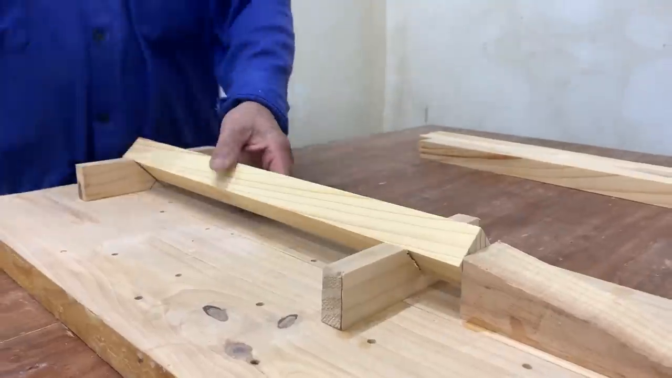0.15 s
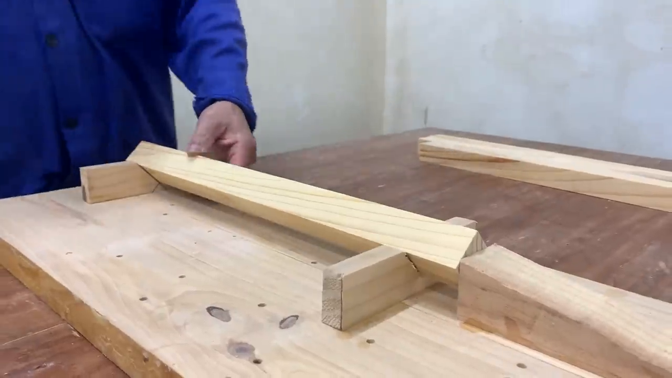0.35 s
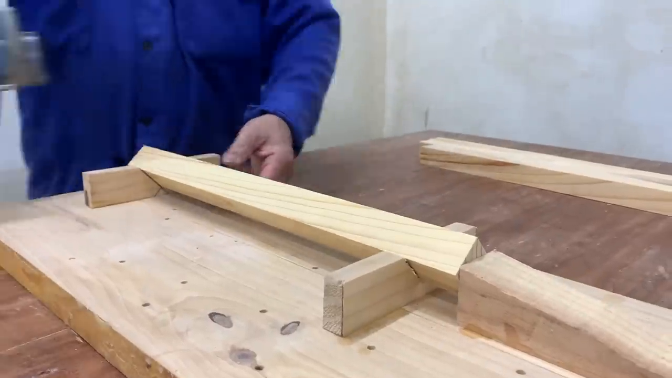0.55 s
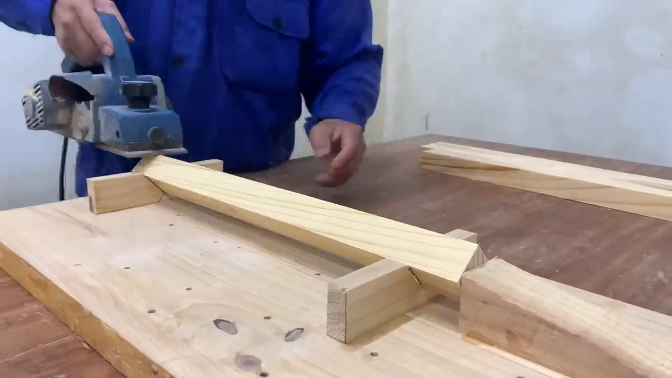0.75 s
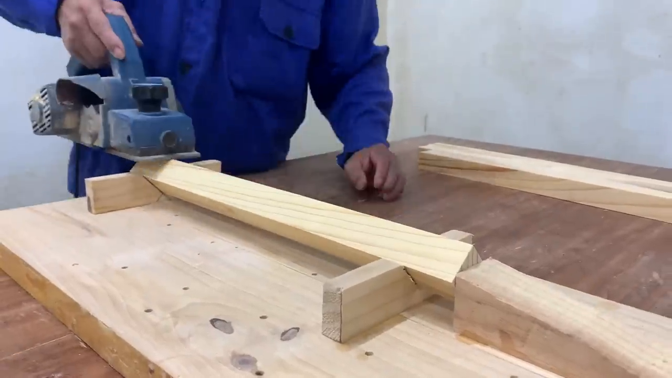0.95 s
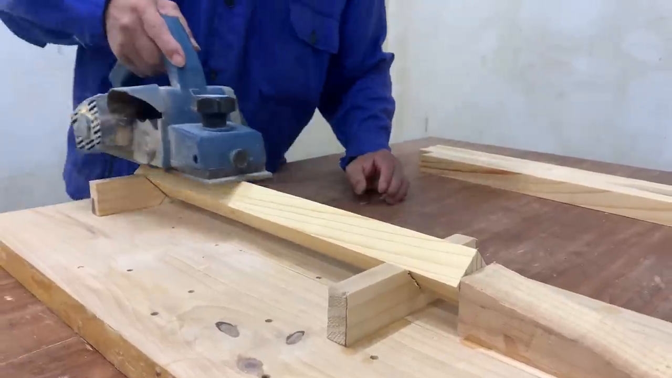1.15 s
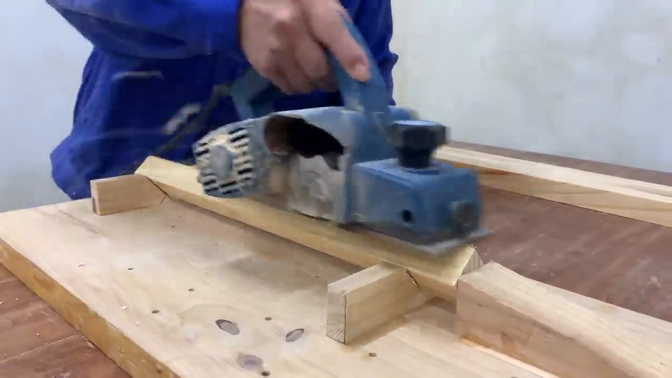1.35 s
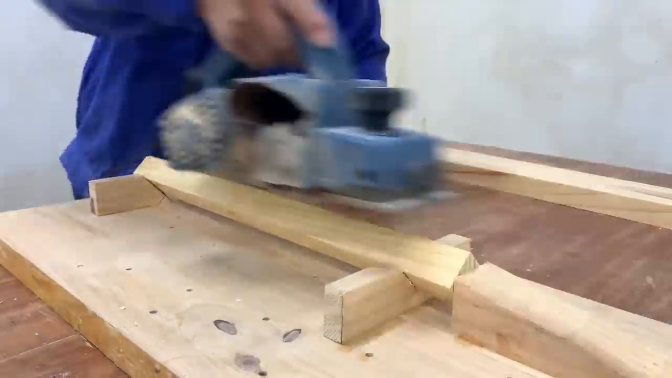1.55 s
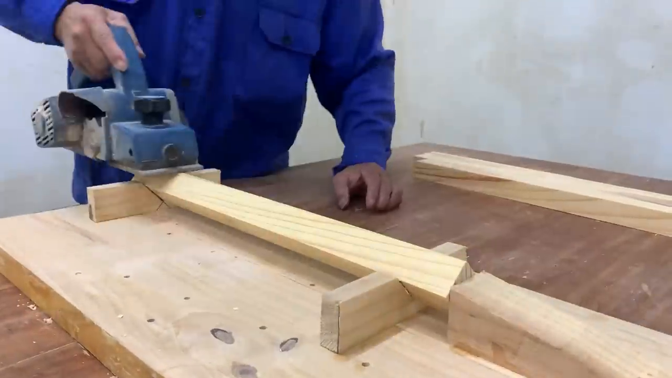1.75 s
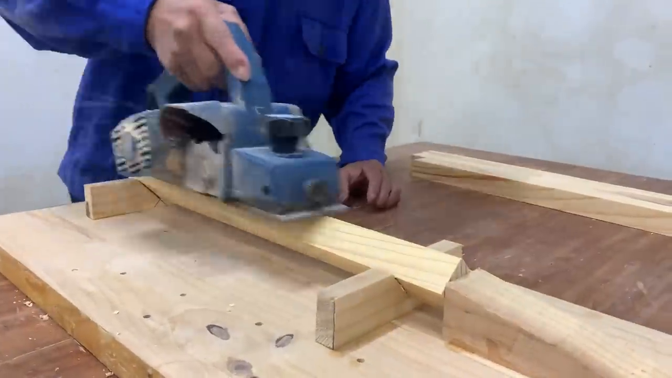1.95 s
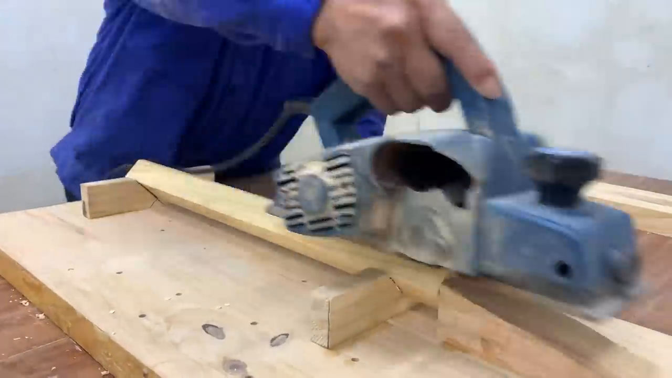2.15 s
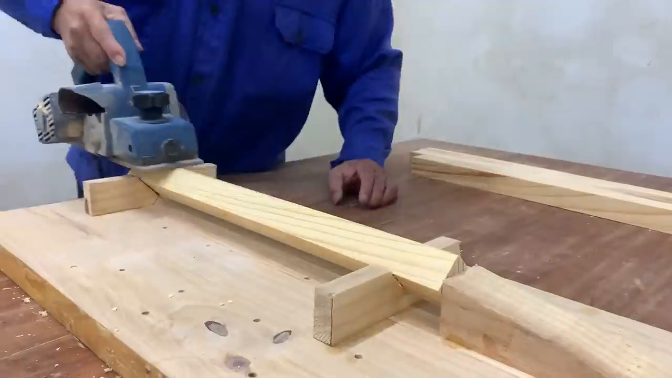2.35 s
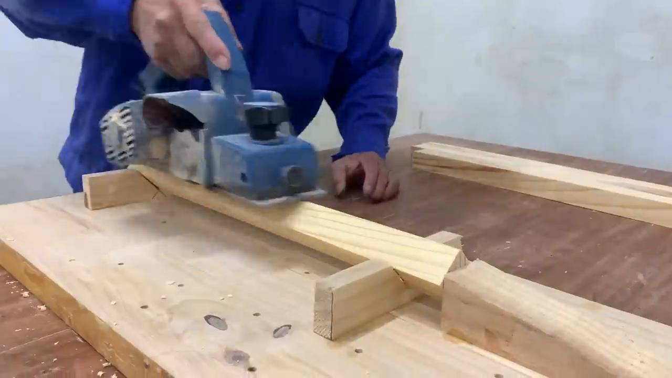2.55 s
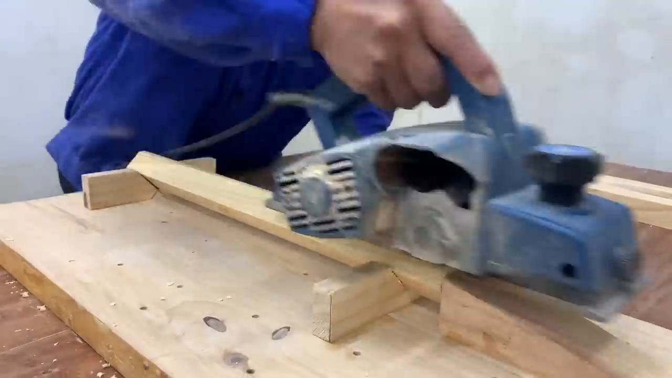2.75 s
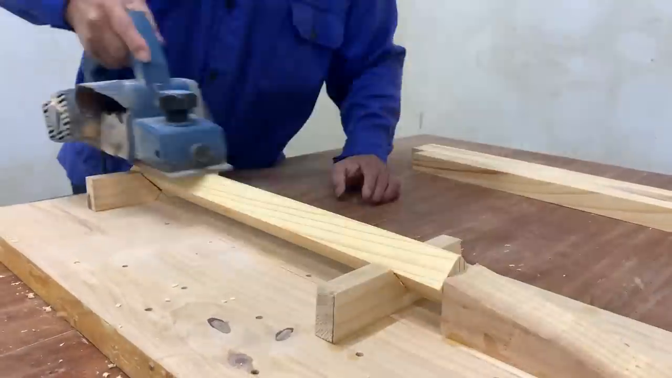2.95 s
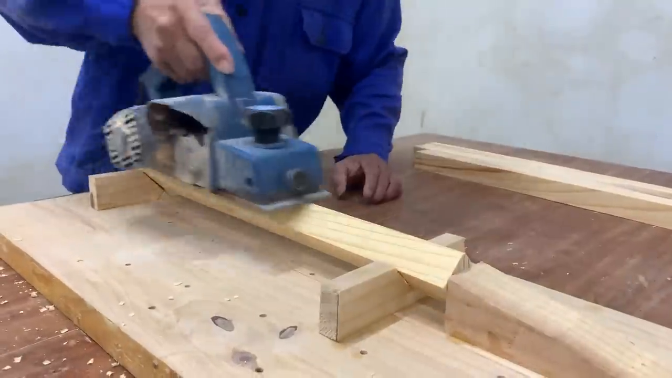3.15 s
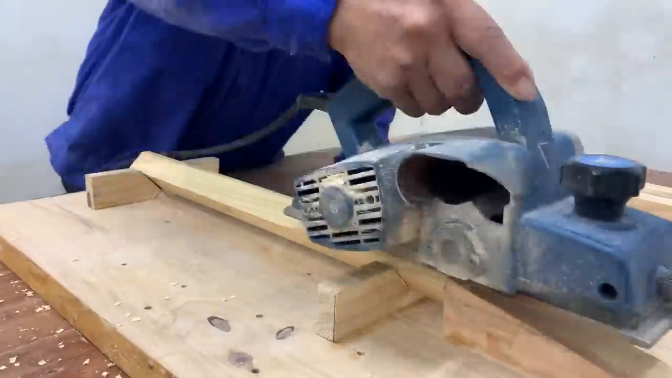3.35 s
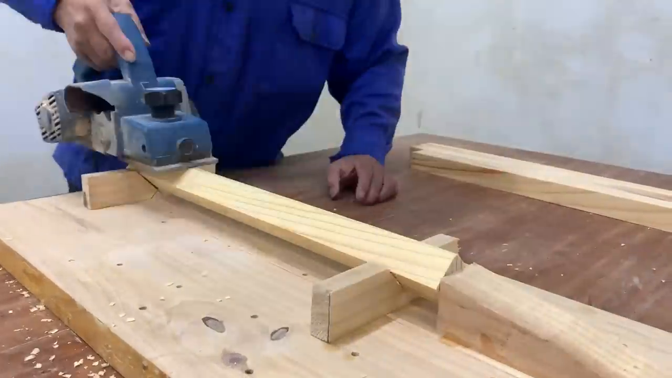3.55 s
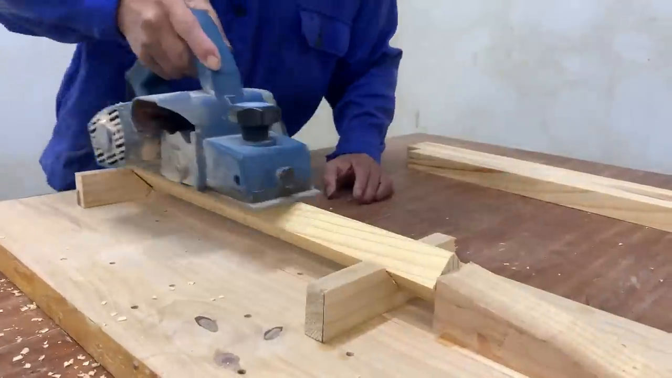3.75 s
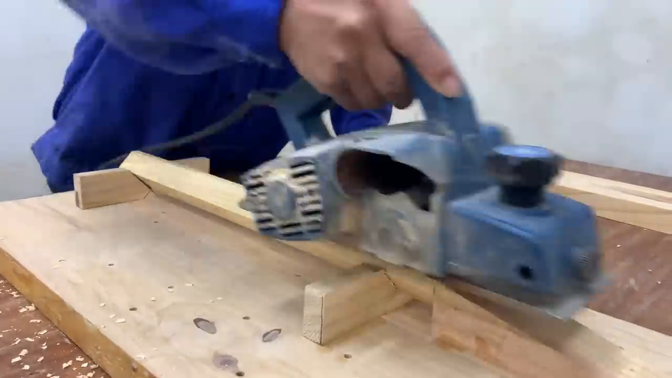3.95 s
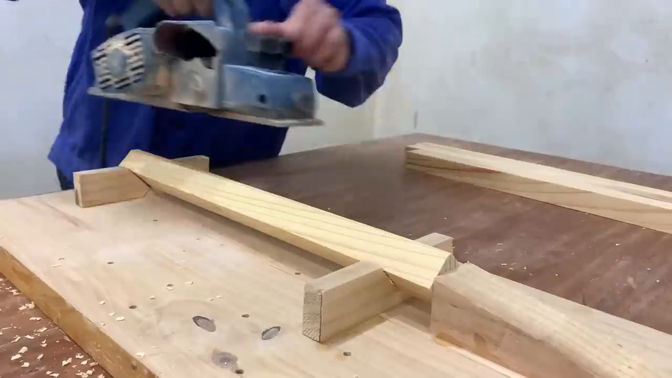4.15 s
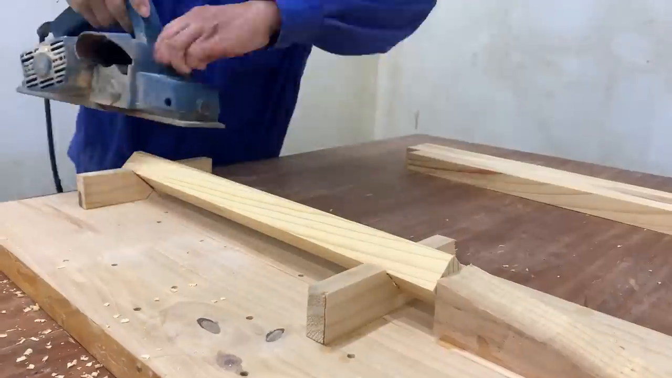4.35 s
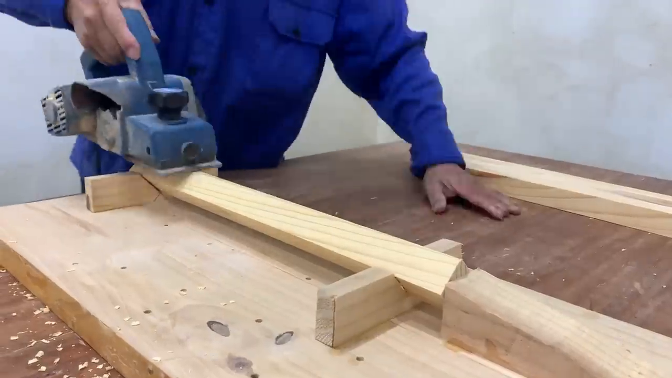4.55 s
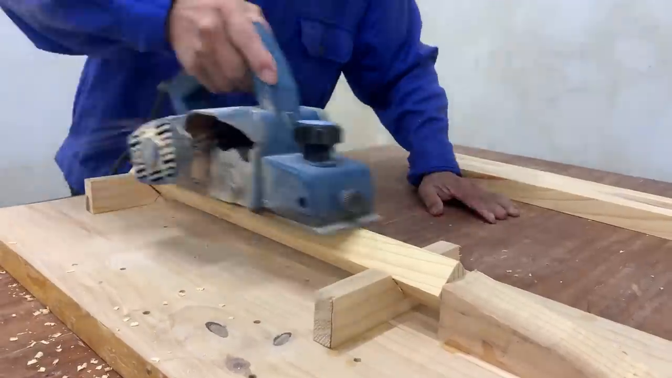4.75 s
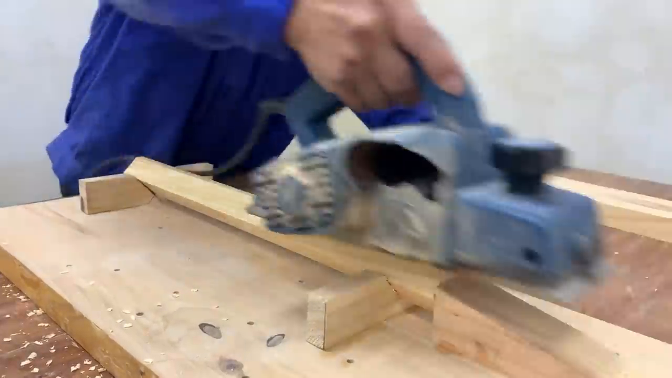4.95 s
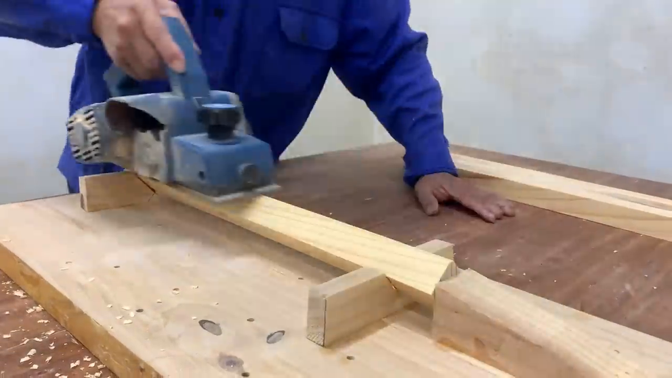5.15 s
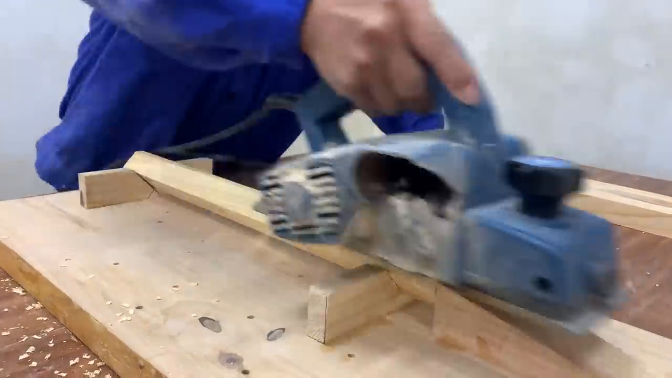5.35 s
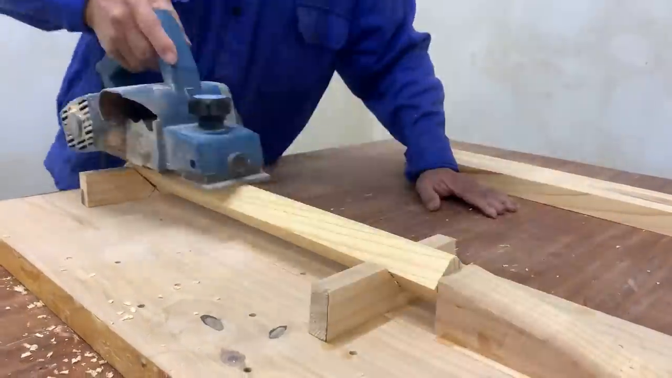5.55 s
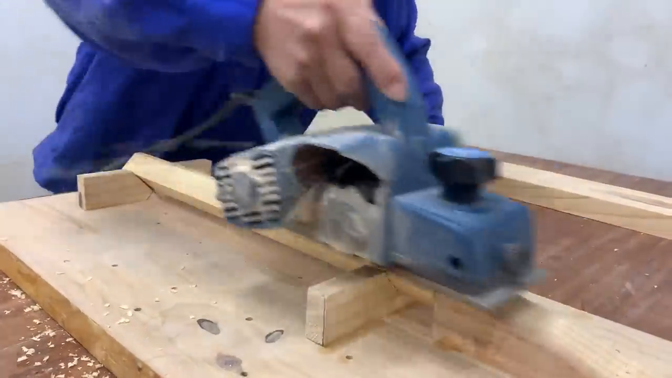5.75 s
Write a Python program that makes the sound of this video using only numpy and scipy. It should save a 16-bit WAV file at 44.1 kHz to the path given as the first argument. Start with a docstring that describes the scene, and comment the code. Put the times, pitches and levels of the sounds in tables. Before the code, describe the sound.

A close stereo scene in a bare workshop. From 0 to 0.3 s a pine batten judders, scrapes and knocks into its cradle, with the sharpest dry crack near 0.25 s, while a planer freewheels quietly, its low whirr falling in pitch under a thin high whistle. A soft bump comes near 0.8 s. Just before 1 s the motor buzzes and groans, the belt gives tiny high squeaks, and a loud whine sweeps up fast over broad rushing air. Passes swell closest around 1.6, 2.3, 2.9, 3.5, 4.1, 5.0, 5.5 and 5.8 s, the pitch sagging slightly as the knives bite and the shrill tones flaring as the tool nears. The trigger is released briefly at 1.6 s and for longer from 4.1 to 4.6 s; the whine slides down, then climbs again. Faint dull bench thuds punctuate the passes. The motor is still running at the end.

```python
"""Electric hand planer at work

A hand planer coasts down close by in a bare workshop while a pine batten chatters into its cradle.
It is switched on and pushed along the batten pass after pass; the trigger is let go twice.
Fan, armature and belt whine as tones locked to the shaft, over filtered noise for air and chips.
The wood is struck and scraped modes: judders and knocks of the batten, soft bumps on the bench."""
import sys
import numpy as np
from scipy import signal
from scipy.fft import rfft, irfft
from scipy.io import wavfile
from scipy.ndimage import uniform_filter1d

SR = 44100
rng = np.random.default_rng(int(sys.argv[2]) if len(sys.argv) > 2 else 0)


def generate_wav(signal):
    """Clip the signal to [-1, 1] and save it as 16-bit WAV at the path in sys.argv[1]."""
    frames = np.transpose(np.atleast_2d(signal))
    scaled = np.clip(frames, -1, 1) * 32767
    pcm = np.round(scaled).astype(np.int16)
    wavfile.write(sys.argv[1], SR, pcm)


N = 259749
TIME = np.arange(N) / SR
# the grid on which noise is painted: bins in Hz, frames in s
BINS = np.fft.rfftfreq(512, 1 / SR)
FRAMES = np.arange(N // 128 + 5) * 128 / SR

# the freewheeling tool before switch-on: t/s, shaft speed/turns per s, level/dB
COAST = [(0, 98, -30), (.37, 83, -34), (.74, 68.4, -39), (1.0, 64, -42)]
# its whirr, relative spectrum: f/Hz, level/dB per Hz
WHIRR_SPECTRUM = [(41, -57), (70, -41), (108, -18), (207, -10.5), (243, -12), (311, -7), (348, -11.5),
                  (803, 0.5), (1100, -4), (1260, -1.5), (1350, -3.5), (1620, -9.5), (2910, -4.5),
                  (6280, -12.5), (15500, -31)]
# its faint hum, relative: multiple of the shaft rate, level/dB
COAST_TONES = [(4, -4.5), (6, -12), (8, -9), (10, -18), (12, -10), (16, -11)]

# the batten judders into its cradle: t/s, length/s, level/dB, swell over the burst/dB
JUDDERS = [(0.074, 0.015, -22.5, -5), (.099, 0.013, -29, -4), (0.14, .034, -20.5, -2),
           (0.238, 0.013, -18, 3), (0.246, .038, -18.5, -8.5), (0.299, 0.044, -34.5, -14)]
# its hard knocks: t/s, level/dB
KNOCKS = [(0.154, -20), (0.171, -24), (0.2454, -10), (0.26, -29)]
# ringing modes of batten and bench: f/Hz, level/dB, t60/s
PINE_MODES = [(300, -11, 0.12), (463, 1, 0.06), (590, -2, 0.061), (816, 0, 0.062), (899, 4, 0.12),
              (1046, -2, 0.025), (1380, 1, 0.013), (1820, -12, 0.034), (2160, -2, 0.021),
              (2940, -19, 0.016), (3400, -3, 0.013), (4150, -18, 0.012)]
# spectrum of the dense, short-lived modes of the wood: f/Hz, level/dB per Hz
CLATTER_SPECTRUM = [(150, -26), (330, 0), (600, -1.5), (1200, -2.5), (2400, -7), (3800, -13.5),
                    (5500, -18.5), (9000, -49), (15000, -50)]
# the sole and the hand bump the bench: t/s, level/dB, share of dead push
BUMPS = [(0.817, -35, 0.037), (.853, -40, 0.28), (0.964, -37, .2), (1.173, -40.5, 0.15), (1.234, -63, .8),
         (1.738, -40.5, .04), (2.148, -47, .08), (2.389, -44.5, .08), (2.753, -50, 0.023),
         (3.048, -42, 0.29), (3.598, -42.5, 0.075), (3.694, -42, .4), (3.749, -49, .7), (4.673, -48, .55),
         (4.744, -43.5, .4), (5.148, -39, .2), (5.249, -44.5, .45), (5.551, -48, .1), (5.646, -37.5, .35)]
# modes of the bench top, before each blow's own variation: f/Hz, level/dB, t60/s
BENCH_MODES = [(110, -19, 0.065), (155, -4.5, 0.053), (190.4, 6.5, 0.052), (242, 5.5, 0.027)]

SWITCH_ON = 0.97  # s, the current sets in
# the trigger is held: pressed t/s, let go t/s
TRIGGER = [(1.0, 1.614), (1.758, 4.133), (4.572, 6.0)]
# the motor pulls towards its free speed (turns per s), harder the further it lags
# (per s, and per s and turn per s)
FREE_SPEED, PULL, STALL_PULL = 148.83, 2.893, .06
# share of speed lost per s when released; turns per s that a full bite takes off each s
DRAG_PER_S, CUT_LOAD = .831, 15
# the knives bite into the batten: deepest t/s, half length/s
CUTS = [(1.397, .372), (2.098, .078), (2.673, .171), (3.254, .16), (3.887, .132), (4.933, .052),
        (5.421, .082), (5.823, .057)]
# each pass carries the tool nearer and away again: nearest t/s, approach/s, retreat/s, swell/dB,
# t/s at which the bench reflection cancels the armature tone, change of that tone/dB
PASSES = [(1.58, 0.3, 0.089, 8.5, 1.53, 0), (2.265, 0.24, .087, 9, 2.13, -15),
          (2.875, 0.27, 0.1, 7.5, 2.8, -4), (3.451, 0.13, 0.092, 7.5, 3.27, -12),
          (4.11, 0.18, 0.12, 7.5, 4.3, -84), (5.02, 0.21, 0.14, 9, 4.9, -16),
          (5.5, 0.13, 0.094, 11, 5.37, 0.5), (5.83, 0.081, 0.32, 6.5, 5.71, -19)]
DIP_S = 0.036  # half length of the armature tone's dip
SETTLE_S = 0.27  # time constant with which the switch-on surge dies away

# buzz of the starting current
INRUSH_DB, INRUSH_RISE_S, INRUSH_HOLD_S, INRUSH_FALL_DB_PER_S = -29, 0.0042, 0.063, 200
# the belt squeaks as it takes up the load: t/s, f/Hz, level/dB
SQUEAKS = [(.993, 11900, -33), (1.026, 10300, -39), (1.052, 11800, -24)]
SQUEAK_FALL_DB_PER_S = 1100

# relative spectrum of the air through the housing: f/Hz, level/dB per Hz
AIR_SPECTRUM = [(120, -19.5), (200, -33), (290, -16), (450, -13.5), (750, -12.5), (1100, -9.5), (1600, 4),
                (2050, -1), (3300, 2), (5200, -4.5), (7000, -9.5), (8700, -9.5), (10500, -12.5),
                (15000, -6)]
AIR_DB = -32.5  # before the swells
# how the air follows the tool: f/Hz, share of the pass swell, dB per dB of speed, extra at switch-on/dB
AIR_LAW = [(500, 0.42, 2.5, 21), (1020, 0.76, 2.9, 22), (1480, 0.71, 3, 22), (2230, 0.2, 3.87, 30),
           (4350, 0.32, 1.5, 20.5), (6650, 1.0, 2.46, 26), (12200, 0.41, 2.4, 24.5)]

# fan tones, relative: multiple of the shaft rate, level/dB
FAN_TONES = [(11, -5), (12, 1.5), (18, -73), (22, -4.5)]
# shrill lines, relative: multiple of the shaft rate, level/dB
SHRILL_TONES = [(30, -37), (33, -38), (35, -45), (42, -41), (44, -46), (48, -36), (54, -44), (55, -41),
                (57, -46), (60, -34), (62, -46), (66, -42), (72, -41), (77, -50), (78, -48), (84, -41),
                (88, -48), (90, -42), (96, -39), (99, -45), (102, -48), (108, -49)]
BELT_TEETH = 28.43  # tooth rate as a multiple of the shaft rate
# belt tone and sidebands, relative: multiple of the tooth rate, plus shaft multiples, level/dB
BELT_TONES = [(1, 0, 0), (1, 6, -18), (1, 11, -11.5), (1, 17, -40), (1, 22, -15.5), (1, 33, -22),
              (2, 0, -45), (2, 11, -27)]
# how each tone follows the tool:
# level at full speed/dB, share of the pass swell, dB per dB of speed, extra at switch-on/dB
FAN_LAW = (-29.5, 0.187, 2.5, 25)
DRONE_LAW = (-44.5, 0.42, 2, 24.5)
ARMATURE_LAW = (-26.5, 0.6367, 4.5, 18)
BELT_LAW = (-39, 0.9649, -0.3, 9.5)
OVERTONE_LAW = (-28, 0.75, 2, 22.5)
SHRILL_LAW = (-6.5, 0.8964, 3, 23)
# the belt tone's rise and fall on top of its law: t/s, level/dB
BELT_LEVEL = [(1.0, -3), (1.3, 6.5), (1.55, 1.5), (2.0, -1), (2.3, -3), (2.55, -10), (2.9, 5.5), (3.1, -5),
              (3.4, 5.5), (3.7, 0.5), (4.1, 5.5), (4.4, 4.5), (4.56, -8), (4.66, 7), (4.78, -10), (5.05, 5),
              (5.3, 4.5), (5.55, 7.5), (5.89, -2)]
# the fan peaks where the blade rate meets a resonance of the housing: blade rate f/Hz, level/dB
HOUSING = [(800, -57), (1200, -19), (1350, -17), (1460, -9), (1580, 1), (1660, 0.5), (1760, 0)]
# the motor tones swell as they glide through a resonance of the air outlet: f/Hz, level/dB
OUTLET = [(1500, -12), (2000, 8), (2450, -0.5), (2900, -4), (3250, 0.5), (3600, -1.5), (4000, -10.5),
          (4500, -8.5), (5200, -6.5)]
# the shrill lines flare as they glide through a resonance of the cooling slots: f/Hz, level/dB
SLOTS = [(5000, -4.5), (7000, 0), (8000, -2.5), (8900, 1), (9700, -1.5), (10600, -6.5), (15000, -3.5)]

# decay of the workshop: f/Hz, t60/s
ROOM_DECAY = [(150, 0.48), (1000, 0.34), (4000, 0.23), (12000, 0.13)]
# left-right likeness of the stereo pair: f/Hz, correlation
LIKENESS = [(100, 0), (400, 0.82), (1500, 0.77), (3000, 0.6), (5000, 0.25), (8000, 0.31), (13000, -0.26)]
# balance of the stereo pair: f/Hz, left minus right level/dB
TILT = [(100, 3), (300, -2), (1000, -2.5), (2200, -2.5), (5000, 0.8), (9000, -1)]
EDGE_HZ = 15850  # upper band limit


def amp(db):
    """Decibels to gain."""
    return 10 ** (np.asarray(db) / 20)


def unit(x):
    """Scales to rms 1."""
    return x / np.sqrt(np.mean(x ** 2) + 1e-20)


def curves(rows, t=TIME):
    """The columns of a time table, joined by straight lines."""
    s, *columns = np.transpose(rows)
    return [np.interp(t, s, c) for c in columns]


def across(points, hz):
    """Reads a spectrum on a log-frequency axis."""
    f, value = np.transpose(points)
    return np.interp(np.log(hz + 1), np.log(f), value)


def add(mix, s, sound):
    """Mixes a sound in at time s."""
    part = mix[max(round(s * SR), 0):][:len(sound)]
    part += sound[:len(part)]


def drift(rate):
    """Smooth random wander of rms 1 that changes about rate times a second."""
    points, per_s = 2048, 300
    f = np.fft.rfftfreq(points, 1 / per_s)
    slow = irfft(rfft(rng.standard_normal(points)) * np.exp(-(f / rate) ** 2))
    return np.interp(TIME * per_s, np.arange(points), unit(slow))


def ring(modes):
    """One blow on a body: decaying sines, scaled to energy 1."""
    t = np.arange(SR // 3) / SR
    wave = np.zeros(len(t))
    for k, (hz, db, t60) in enumerate(modes):
        wave += (-1) ** k * amp(db - 60 * t / t60) * np.sin(2 * np.pi * hz * t)
    return wave / np.linalg.norm(wave)


def noise(spectrum, swell_db, patchy_db):
    """Turbulent noise at two microphones, painted in time and frequency with random patches."""
    a, b, c, d, patches = rng.standard_normal((5, len(FRAMES), len(BINS)))
    patches = uniform_filter1d(patches, size=14, axis=0)
    patches = unit(uniform_filter1d(patches, size=6, axis=1))
    same = np.clip(across(LIKENESS, BINS), -1, 1)
    left = a + 1j * b
    right = same * left + np.sqrt(1 - same ** 2) * (c + 1j * d)
    z = np.array([left, right])
    z *= unit(amp(across(spectrum, BINS))) * amp(swell_db + patchy_db * patches)
    pair = signal.istft(z.transpose(0, 2, 1), nperseg=512, noverlap=384)[1][:, :N]
    return pair / np.sqrt(256 / 3)  # rms 1 before swell and patches


def tone(turns, hz, fading, rate):
    """A line at two microphones; reflections off bench and walls fade in and out as the tool moves."""
    t = np.arange(1024) / 150
    smooth = np.exp(-(np.fft.fftfreq(len(t), t[1]) / rate) ** 2)
    chance = rng.standard_normal((3, len(t))) + 1j * rng.standard_normal((3, len(t)))
    paths = np.fft.ifft(chance * smooth)
    paths /= np.sqrt(np.mean(abs(paths) ** 2))
    same = np.clip(across(LIKENESS, hz), -.9, .95)
    mid = (1 + fading * paths[0]) / np.hypot(1, fading)
    side = paths[1] * np.array([[1], [-1]])
    ears = np.sqrt((1 + same) / 2) * mid + np.sqrt((1 - same) / 2) * side
    carrier = np.exp(2j * np.pi * turns)
    return np.sqrt(2) * np.array([(np.interp(TIME, t, ear) * carrier).real for ear in ears])


def trigger(t, ramp_s):
    """1 while the trigger is held, 0 while it is not, with ramps between."""
    return sum(np.clip((t - on) / ramp_s, 0, 1) - np.clip((t - off) / ramp_s, 0, 1) for on, off in TRIGGER)


def motor_speed():
    """Shaft turns per s: the motor pulls while the trigger is held, coasts otherwise, sags in each cut."""
    step = 1 / 500  # s
    t = np.arange(0, N / SR + step, step)
    held = trigger(t, step)
    load = CUT_LOAD * sum(np.exp(-((t - s) / half) ** 2) for s, half in CUTS)
    speed = curves(COAST, t)[0]
    for i in np.flatnonzero(t > TRIGGER[0][0]):
        before = speed[i - 1]
        lag = FREE_SPEED - before
        pull = (PULL + STALL_PULL * lag) * lag - load[i]
        speed[i] = before + step * (held[i] * pull - (1 - held[i]) * DRAG_PER_S * before)
    return np.interp(TIME, t, speed)


def shaft(speed, flutter=0.001):
    """Turns of the shaft: its speed summed over time, slightly unsteady."""
    return np.cumsum(speed * (1 + flutter * drift(rate=70))) / SR


def gestures(speed):
    """What the levels follow: swell of the passes (dB), speed (dB), surge after switch-on (1 to 0)."""
    near_db = np.zeros(N)
    for s, approach, retreat, db, _, _ in PASSES:
        near_db += db * np.exp(-((TIME - s) / np.where(TIME < s, approach, retreat)) ** 2)
    surge = np.exp(-np.maximum(TIME - TRIGGER[0][0], 0) / SETTLE_S)
    return np.array([near_db, 20 * np.log10(speed / 146), surge])


def level(law, moves):
    """Gain over time of a layer that follows the gestures by its law."""
    return amp(law[0] + np.dot(law[1:], moves))


def stall():
    """Gain of the starting current: it snaps on, holds, and falls as the rotor gets going."""
    t = TIME - SWITCH_ON
    fall_db = INRUSH_FALL_DB_PER_S * np.maximum(t - INRUSH_HOLD_S, 0)
    return np.clip(t / INRUSH_RISE_S + .5, 0, 1) * amp(INRUSH_DB - fall_db)


def flare(order, speed, full_speed):
    """Gain of a shrill line in the cooling slots against its gain at full speed."""
    return amp(across(SLOTS, order * speed) - across(SLOTS, order * full_speed))


def coast(turns, whistle_hz=12600, whistle_db=-26):
    """Without current the rotor whirrs, hums faintly and slows; a thin whistle rides on it."""
    hum = sum(amp(db - 5.0) * tone(k * turns, k * 80, fading=0.69, rate=4.8) for k, db in COAST_TONES)
    whistle_turns = np.cumsum(whistle_hz + 45 * drift(rate=83)) / SR
    whistle = tone(whistle_turns, whistle_hz, fading=0.55, rate=14)
    whistle *= np.interp(TIME, [.3, .8], [1, 0])
    whirr = noise(WHIRR_SPECTRUM, 0, patchy_db=.8)
    ends = np.interp(TIME, [1.0, 1.15], [1, 0])
    return ends * amp(curves(COAST)[1]) * (amp(-2.5) * whirr + hum + amp(whistle_db) * whistle)


def batten(slips_per_s=700, scrape=0.093, clatter=0.75, clatter_t60=0.049, crack=1.94):
    """The batten sticks and slips against its cradle and knocks home, each impulse ringing the wood."""
    count = SR // 3
    dense_gain = amp(across(CLATTER_SPECTRUM, np.fft.rfftfreq(count, 1 / SR)))
    dense = irfft(rfft(rng.standard_normal(count)) * dense_gain, count)
    dense *= amp(-60 * TIME[:count] / clatter_t60)
    body = (ring(PINE_MODES) + clatter * dense / np.linalg.norm(dense)) / np.hypot(1, clatter)
    force, contact = np.zeros((2, N))
    for s, length, db, swell_db in JUDDERS:
        n = int(length * SR)
        chance, size = rng.random(n), rng.standard_normal(n)
        # sparse slips of either sign over a light scrape
        slips = np.sign(size) * (chance < slips_per_s / SR) + scrape * size
        add(force, s, amp(db + swell_db * np.linspace(-.5, .5, n)) * unit(slips))
    for s, db in KNOCKS:
        add(force, s, np.array([amp(db) / abs(body).max()]))
        add(contact, s, amp(db) * rng.standard_normal(count) * np.exp(-TIME[:count] / 0.0031))
    # edge meets edge with a short bright crack
    bright = signal.butter(2, [1300, 3300], "band", fs=SR, output="sos")
    return signal.oaconvolve(force, body)[:N] + crack * signal.sosfilt(bright, contact)


def bumps(push_s=0.003, dead_s=0.023):
    """Soft blows: a short dead push, and the bench modes thud with it."""
    out = np.zeros(N)
    for s, db, dead in BUMPS:
        # each blow lands on another spot and wakes the modes in other shares
        spot = [(hz, mode_db + 3 * rng.standard_normal(), t60) for hz, mode_db, t60 in BENCH_MODES]
        thud = np.convolve(ring(spot), np.hanning(int(push_s * SR)))
        thud /= abs(thud).max()
        add(thud, 0, dead * np.hanning(int(dead_s * SR)))
        add(out, s, amp(db) * thud)
    return out


def inrush(overtones_db=-22):
    """The motor buzzes at multiples of 100 Hz until it picks up speed, and the belt squeaks."""
    mains = 2 * np.pi * 100 * TIME
    buzz = np.sin(3 * mains) + amp(overtones_db) * (np.sin(5 * mains) + np.sin(6 * mains))
    chirps = sum(amp(db - SQUEAK_FALL_DB_PER_S * np.minimum(abs(TIME - s), 1)) for s, _, db in SQUEAKS)
    # the pitch slides from squeak to squeak and trembles
    squeak_hz = curves(SQUEAKS)[0] + 120 * drift(rate=112)
    squeak = chirps * unit(np.sin(2 * np.pi * np.cumsum(squeak_hz) / SR))
    return stall() * amp(0.5 * drift(rate=42)) * unit(buzz) + squeak


def rush(turns, moves, chop=0.19, knife_chop=0.055, low_hz=270, hum_db=-63, hum_swell=0.083):
    """Air and chips leave the housing, chopped by the fan and the knives, over a faint mains hum."""
    hz, *columns = np.transpose(AIR_LAW)
    swell_db = 0
    for move, column in zip(moves, columns):
        swell_db = swell_db + np.outer(np.interp(FRAMES, TIME, move), across(np.c_[hz, column], BINS))
    low = across([(1100, 0.93), (2300, 0)], BINS)
    high = across([(5000, 0), (9500, 1.0)], BINS)
    # the grain of the wood makes the shaving uneven, separately in low, middle and high bands
    for share in (low, 1 - low - high, high):
        grain_db = 1.2 * drift(rate=70) + .5 * drift(rate=10)
        swell_db = swell_db + share * np.interp(FRAMES, TIME, grain_db)[:, None]
    air = noise(AIR_SPECTRUM, swell_db, patchy_db=1.1)
    blades = np.cos(2 * np.pi * 6 * turns)
    knives = np.cos(2 * np.pi * 2 * turns)
    air *= amp(AIR_DB) * (1 + chop * blades + knife_chop * knives)
    air = signal.sosfilt(signal.butter(8, low_hz, "high", fs=SR, output="sos"), air)
    hum = tone(300 * TIME, 300, fading=2, rate=12)
    return air + amp(hum_db + hum_swell * moves[0]) * hum


def whine(turns, speed, moves, full_speed=146, groan_db=0, unpowered_db=-9):
    """Fan blades, armature slots and belt teeth sing on multiples of the shaft rate."""
    fan = sum(amp(db) * tone(k * turns, k * full_speed, fading=0.28, rate=19) for k, db in FAN_TONES)
    out = amp(across(HOUSING, 12 * speed)) * level(FAN_LAW, moves) * fan
    # the low drone groans as the starting torque gets the rotor going, and sinks when the current is cut
    drone_gain = level(DRONE_LAW, moves) * amp(unpowered_db * (1 - trigger(TIME, 0.13)))
    groan = amp(groan_db + 2.9 * (moves[1] + 4.5)) * stall()
    out += (drone_gain + groan) * tone(6 * turns, 880, fading=.45, rate=22)
    armature = amp(across(OUTLET, 24 * speed)) * tone(24 * turns, 1500, fading=.5, rate=22)
    dips_db = sum(db * np.exp(-((TIME - s) / DIP_S) ** 2) for *_, s, db in PASSES)
    out += level(ARMATURE_LAW, moves) * amp(dips_db) * armature
    overtone = amp(across(OUTLET, 36 * speed)) * tone(36 * turns, 3000, fading=.75, rate=24)
    out += level(OVERTONE_LAW, moves) * overtone
    belt = level(BELT_LAW, moves) * amp(curves(BELT_LEVEL)[0])
    for teeth, k, db in BELT_TONES:
        order = teeth * BELT_TEETH + k
        out += amp(db) * belt * tone(order * turns, order * full_speed, fading=0.55, rate=20)
    # the shrillest lines need speed; they beam out of the chip outlet and swell as it comes near
    shrill = np.zeros((2, N))
    for k, db in SHRILL_TONES:
        line = tone(k * turns, k * full_speed, fading=2.2, rate=20)
        shrill += amp(db) * flare(k, speed, full_speed) * line
    return out + level(SHRILL_LAW, moves) * shrill


def room(x):
    """Sparse reflections off plaster walls, each band dying at its own speed."""
    taps = rng.choice([-1., 1.], (2, SR // 2)) * (rng.random((2, SR // 2)) < 2500 / SR)
    taps[:, :SR // 250] = 0  # no reflection in the first 4 ms
    hz, t, z = signal.stft(taps, SR, nperseg=256)
    tail = signal.istft(z * amp(-60 * t / across(ROOM_DECAY, hz)[:, None]), SR, nperseg=256)[1]
    return signal.fftconvolve(x[None], tail / np.linalg.norm(tail[0]), axes=1)[:, :N]


def from_left(pair, count=3):
    """A source on the left reaches the right microphone a few samples late."""
    return np.array([pair[0], np.pad(pair[1], (count, 0))[:N]])


def scene(spin_up_s=0.099, bite_s=0.025):
    """The planer, coasting then powered, and the wood it meets; only the wood excites the room."""
    speed = motor_speed()
    turns, moves = shaft(speed), gestures(speed)
    powered = np.clip((TIME - SWITCH_ON) / spin_up_s, 0, 1) ** .5
    driven = np.clip((TIME - TRIGGER[0][0]) / bite_s, 0, 1)
    planer = from_left(coast(turns))
    wood = batten() + bumps()
    planer = planer + inrush() + powered * rush(turns, moves) + driven * whine(turns, speed, moves)
    return planer + amp(-1.5) * from_left([wood, wood]) + amp(-9.5) * room(wood)


def record(dry, low_cut_hz=85):
    """Two slightly unlike microphones, a low cut and the band limit."""
    hz = np.fft.rfftfreq(N, 1 / SR)
    balance = amp(across(TILT, hz) * np.array([[.5], [-.5]]))
    heard = irfft(rfft(dry) * balance, N)
    heard = signal.sosfilt(signal.butter(3, low_cut_hz, "high", fs=SR, output="sos"), heard)
    band_limit = signal.firwin(511, EDGE_HZ, window=("kaiser", 9), fs=SR)
    return signal.oaconvolve(heard, band_limit[None], "same")


dry = scene()
out = record(dry)
generate_wav(out)
```